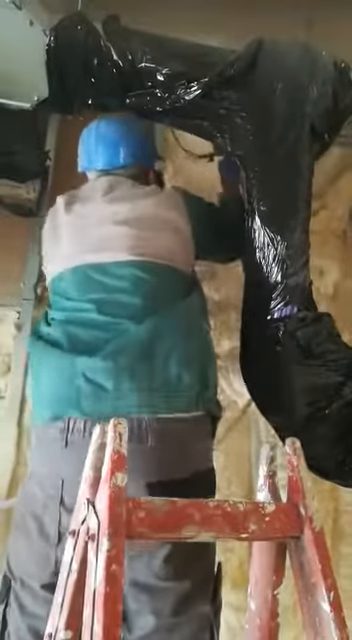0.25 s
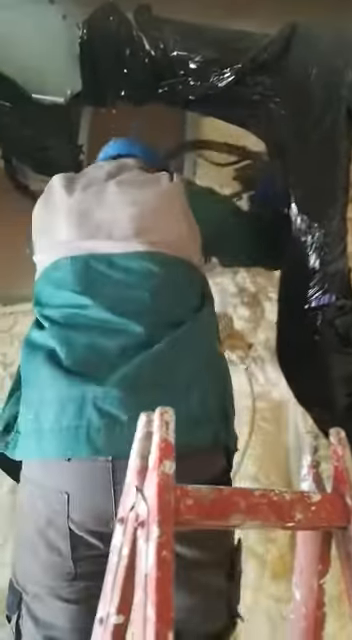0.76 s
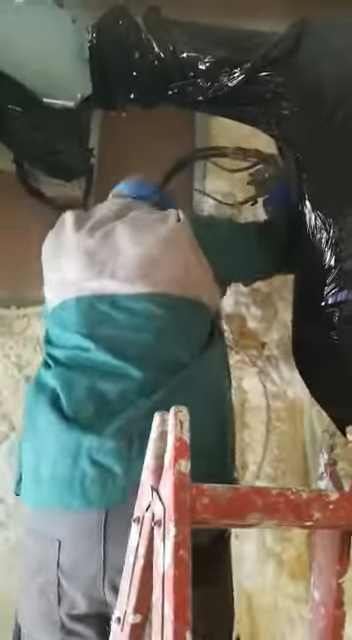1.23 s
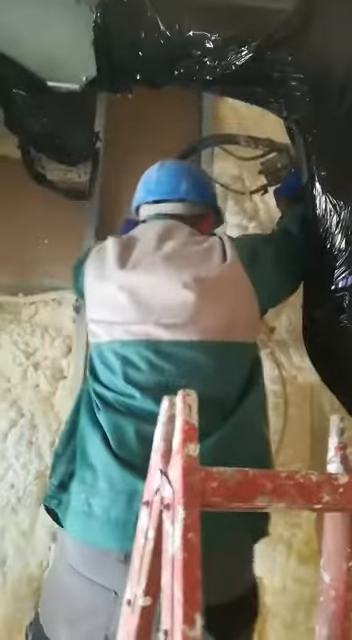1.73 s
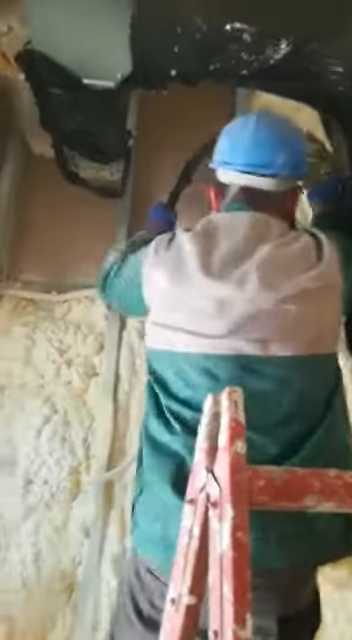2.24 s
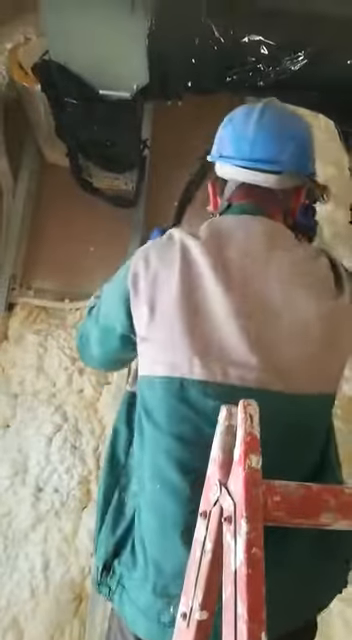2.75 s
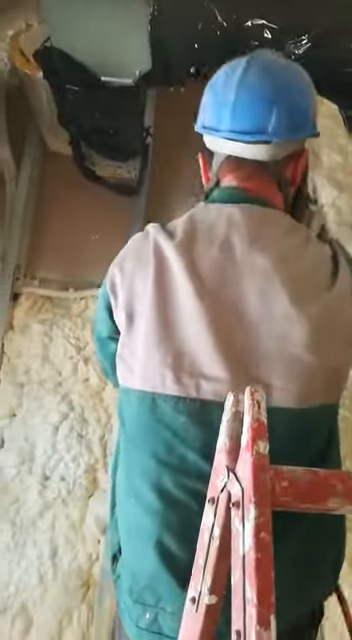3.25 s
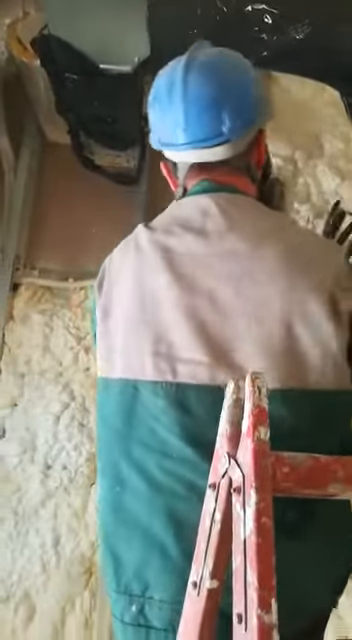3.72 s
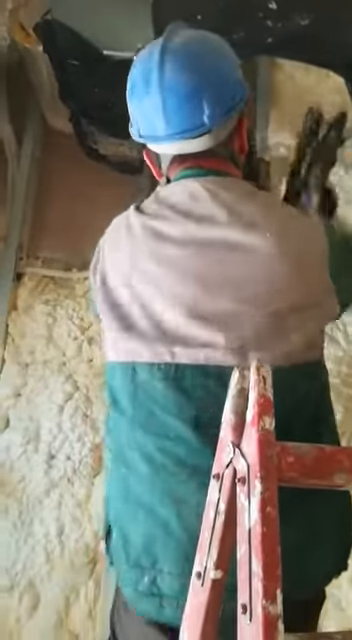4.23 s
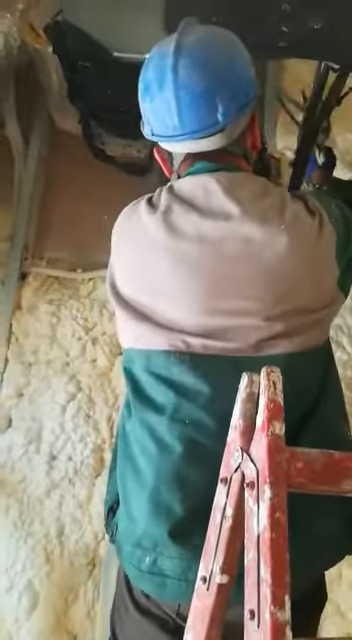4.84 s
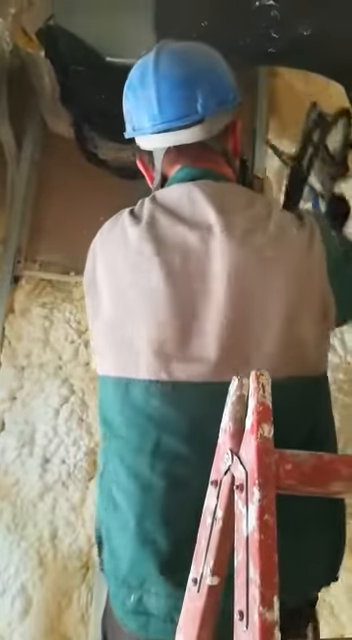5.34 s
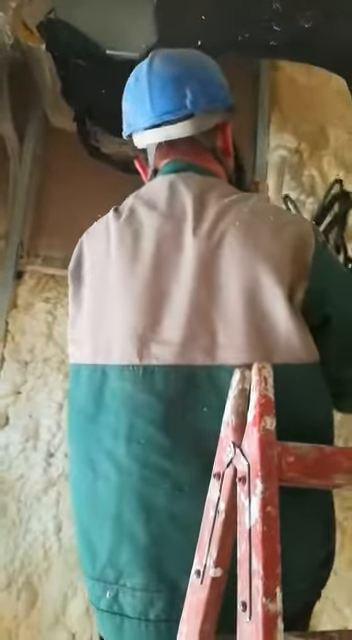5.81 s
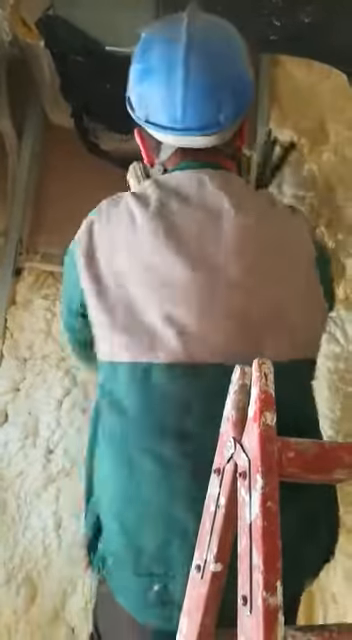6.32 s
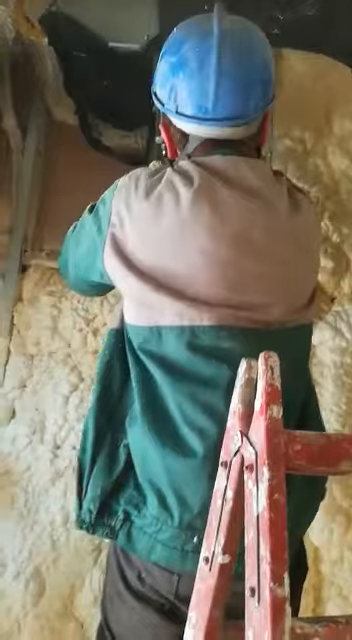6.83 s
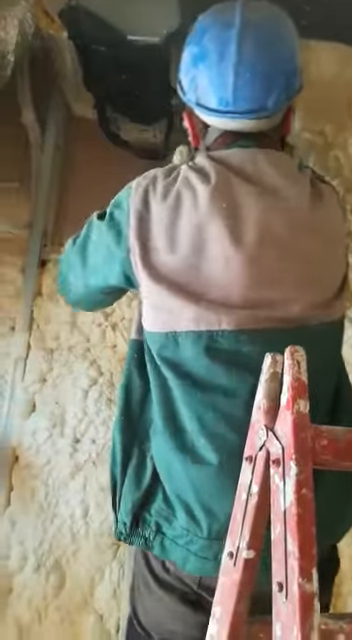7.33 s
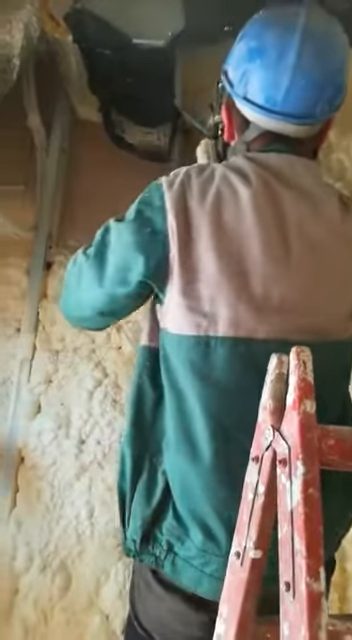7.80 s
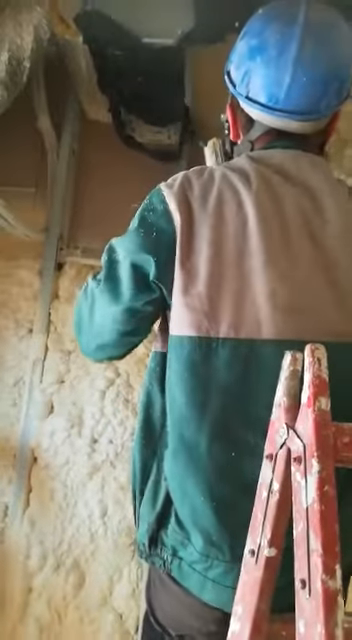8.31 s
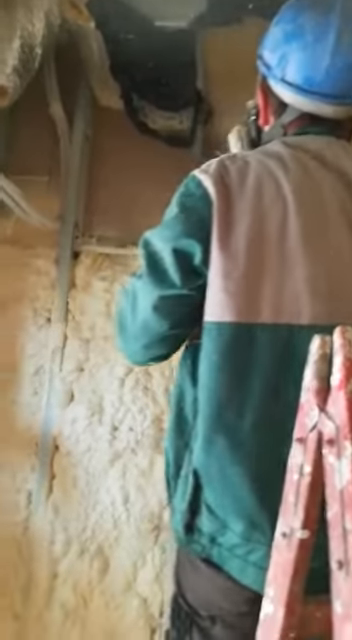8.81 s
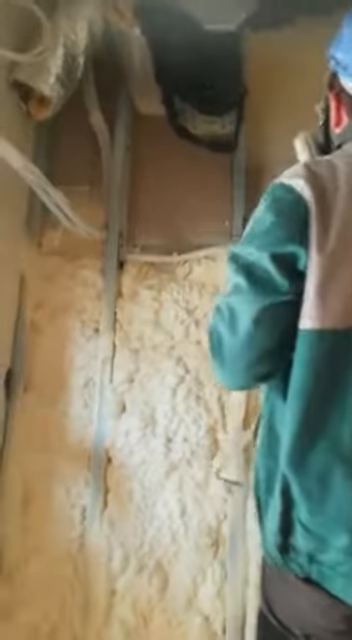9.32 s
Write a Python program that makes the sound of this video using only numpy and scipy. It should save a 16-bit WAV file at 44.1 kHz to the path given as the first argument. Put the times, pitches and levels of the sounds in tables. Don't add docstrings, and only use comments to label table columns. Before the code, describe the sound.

In a small foam-lined room on a building site, a spray gun bleeds air in a constant bright hiss. Early on there are scrapes, brief foam squeaks and scattered boot and hose knocks. Halfway through, trigger pulls make the hiss surge in uneven bursts, then a pull is held to the end. A pump rumbles faintly far away. Handheld stereo microphone nearby, duller in treble on the left.

```python
import sys
import numpy as np
from scipy import signal
from scipy.fft import rfft, irfft, next_fast_len
from scipy.io import wavfile

SR = 44100
rng = np.random.default_rng(int(sys.argv[2]) if len(sys.argv) > 2 else 0)


def file_out(sig):
    cols = np.atleast_2d(sig).T
    lim = np.clip(cols, -1, 1)
    pcm = np.round(lim * 32767).astype(np.int16)
    wavfile.write(sys.argv[1], SR, pcm)


def boost(x):
    u = np.asarray(x, float) / 20
    return 10 ** u


N = 421596
SECONDS = np.arange(N) / SR
SIZE = next_fast_len(N + SR // 2)
HZ = np.maximum(np.arange(SIZE // 2 + 1) * SR / SIZE, 1)

# time in seconds, share from 0 to 1.
SWING = [
    (0, 0),
    (6.1, 0),
    (6.25, 1),
    (6.85, 1),
    (7.1, 0),
    (9.56, 0),
]


def rms_one(x):
    return x / np.sqrt(np.mean(x ** 2) + 1e-20)


def in_time(rows):
    s, *columns = np.transpose(rows)
    return [np.interp(SECONDS, s, column) for column in columns]


def at_hz(points):
    hz, value = np.transpose(points)
    return np.interp(np.log(HZ), np.log(hz), value)


def drift(rate):
    r = np.exp(-80 * np.pi * rate / SR)
    slow = signal.lfilter([1], [1, -2 * r, r * r], rng.standard_normal(N // 40 + 2002))
    slow = rms_one(slow[2000:])
    return np.interp(np.arange(N) / 40, np.arange(len(slow)), slow)


def coloured(x, gain):
    return irfft(rfft(x, SIZE) * gain, SIZE)[..., :N]


def noise(colour):
    return rms_one(coloured(rng.standard_normal((2, N)), boost(at_hz(colour))))


def resonance(x, hz, width_hz):
    r = np.exp(-np.pi * width_hz / SR)
    poles = [1, -2 * r * np.cos(2 * np.pi * hz / SR), r * r]
    return signal.lfilter(np.array([1, 0, -1]) * (1 - r * r) / 2, poles, x)


def sharp_band(x, hz, width_hz):
    return rms_one(resonance(resonance(x, hz, width_hz), hz, width_hz))


def wavering_modes(x, modes, waver_db, rate):
    return rms_one(sum(boost(db + waver_db * drift(rate)) * sharp_band(x, hz, width_hz)
                       for hz, width_hz, db in modes))


def stroke(start, length, rise_s, fade_db_per_s):
    t = SECONDS - start
    return np.clip(t / rise_s, 0, 1) ** 2 * boost(-fade_db_per_s * np.clip(t - length, 0, 1))


def draught():
    # time of the peak in seconds, peak level in dB.
    puffs = [(0.0, -32), (.17, -53), (.37, -50), (.53, -45.5), (.74, -50), (.98, -42), (1.33, -54),
             (2.05, -52), (2.21, -52), (4.37, -59), (4.79, -47), (5.0, -56), (5.78, -68), (6.23, -56),
             (6.65, -51), (6.89, -47), (7.85, -62), (8.23, -48), (9.51, -51)]
    rise_s, fade_db_per_s, calm_db = 0.042, 64, -66
    gusts = boost(calm_db)
    for s, peak_db in puffs:
        gusts = gusts + boost(peak_db) * stroke(s - rise_s, rise_s, rise_s, fade_db_per_s)
    return gusts * noise([(8, -6), (16, 0), (26, -3), (40, -13), (50, -23), (90, -30), (200, -48)])


def rumble():
    # frequency in Hz, level in dB per Hz.
    pump_colour = [(40, -27), (65, -2), (85, -21), (110, 3), (150, -4), (230, -3.5), (300, -7.5),
                   (420, -15), (600, -19), (900, -14), (1400, -23.5)]
    # time in seconds, level in dB.
    pump_level = [(0.0, -46.5), (0.12, -59.5), (2.8, -60), (3.6, -58), (4.2, -60), (6.0, -56.5), (8.0, -63),
                  (9.56, -65)]
    # frequency in Hz, width in Hz, level in dB.
    room_modes = [(69.4, 12, -70), (105.8, 10.6, -62), (177.2, 14.6, -61.5), (473, 36, -76.5)]
    modes = wavering_modes(rng.standard_normal((2, N)), room_modes, waver_db=1.5, rate=4)
    lumpy_db = in_time(pump_level)[0] + 1.6 * drift(2)
    steady = noise(pump_colour) * boost(2.5 + 1.8 * drift(26))
    return boost(lumpy_db) * (steady + boost(-2.5) * modes)


def knocks():
    # start in seconds, peak in dB, body pitch in Hz, time to fade by 60 dB in seconds, crack in dB.
    hits = [(1.621, -48, 223, 0.12, -8), (2.31, -43, 234, 0.11, -5), (2.366, -44, 150, 0.11, -12),
            (2.523, -39, 796, 0.22, 5.5), (2.757, -38.5, 250, 0.06, -12), (2.927, -48, 225, 0.12, -5),
            (3.086, -58, 199, 0.1, -8), (3.272, -45, 400, 0.14, -13), (3.616, -29.5, 320, 0.11, -9),
            (3.638, -29.5, 226, 0.18, -22), (4.342, -45, 248, 0.14, -8), (6.284, -46, 248, 0.12, -9)]
    out, t = np.zeros((2, N)), np.arange(SR // 3) / SR
    for s, peak_db, hz, fade_s, crack_db in hits:
        puff = rng.standard_normal((2, len(t))) * np.minimum(t / 0.002, 1)
        body = rms_one(resonance(puff, hz, 0.37 * hz)) * boost(-60 * t / max(fade_s, .02))
        crack = rms_one(resonance(puff, 1500, 3000)) * boost(crack_db - 60 * t / .12)
        at = round(s * SR)
        out[:, at:at + len(t)] += boost(peak_db - 5.0) * (body + crack)
    return out


def squeaks(wobble=.007):
    # start in seconds, length in seconds, first pitch in Hz, level in dB.
    rubs = [
        (.635, .045, 635, -44),
        (.835, .12, 600, -41.5),
        (1.987, .045, 660, -44),
    ]
    # multiple of the pitch, level in dB.
    orders = [(1, -7), (1.5, -15), (1.7, -11), (2, -12), (3, -24), (4, -26)]
    top_hz, climb_s, sag_db_per_s = 685, .035, 70
    out = 0
    for s, length, first_hz, level_db in rubs:
        t = np.clip(SECONDS - s, 0, 1)
        hz = top_hz - (top_hz - first_hz) * np.exp(-(t / climb_s) ** 2)
        phase = 2 * np.pi * np.cumsum(hz * (1 + wobble * drift(60))) / SR
        lines = sum(boost(db + 3.0 * drift(30)) * np.sin(k * phase) for k, db in orders)
        loudness = boost(level_db - sag_db_per_s * t) * stroke(s, length, 0.0075, 460)
        out = out + np.sqrt(2) * lines * loudness
    return out


def strokes():
    # start in seconds, length in seconds, then studs, hollow wall and sheeting, each in dB.
    rubs = [(0.406, 0.067, -50.5, -57, -50), (0.507, 0.095, -47.5, -61, -47), (.62, .05, -45, -67, -51),
            (0.789, .17, -46, -63, -47), (1.984, 0.098, -51.5, -82, -57), (3.266, .05, -51, -47, -64),
            (3.327, .25, -47.5, -56, -54), (3.61, 0.025, -48, -45, -59), (3.696, .2, -58, -61, -78),
            (4.34, .17, -54, -61.5, -62), (4.505, 0.69, -49, -56, -46.5), (5.309, 0.24, -51.5, -57, -46),
            (5.615, 0.44, -44, -49, -50), (5.795, 0.05, -45, -45, -75), (5.96, 0.059, -43, -52, -75),
            (6.265, .05, -51, -54.5, -75), (6.34, 0.22, -59, -67, -79), (8.2, 0.25, -65, -61, -75),
            (8.72, 0.16, -55, -69, -52), (8.858, 0.2, -49, -67, -48), (9.19, 0.22, -61, -63, -75)]
    rise_s, fade_db_per_s, uneven_db = 0.011, 226, -1
    shapes = np.array([stroke(s, length, rise_s, fade_db_per_s) for s, length, *_ in rubs])
    power = boost(np.array(rubs)[:, 2:].T) ** 2 @ shapes ** 2
    return np.sqrt(power) * boost(uneven_db * drift(3))


def scrapes(grain_per_s=2500, spread_db=3):
    # frequency in Hz, level in dB per Hz.
    stud_colour = [(380, -44), (520, -6), (650, 5.5), (1000, 6), (1400, -2), (2000, -2.5), (3000, -9.5)]
    sheet_colour = [(900, -34), (1400, -5), (2000, -4), (3000, -3.5), (4500, -13), (7000, -16)]
    # frequency in Hz, width in Hz, level in dB.
    stud_modes = [(600, 110, 1), (798, 92, 11.5), (1045, 79, 3.5), (1462, 28, 8.5)]
    sheet_modes = [(1737, 100, 1), (2100, 120, -4), (2290, 71, 12), (3140, 44, -6), (3340, 310, 6)]
    wall_modes = [(249, 92, 6.5), (320, 67, 3.5), (400, 35, -1.5), (463, 36, 0.5)]
    happens = rng.random((2, N)) < grain_per_s / SR
    strength = boost(spread_db * rng.exponential(1, (2, N)))
    slips = happens * strength * rng.choice([-1, 1], (2, N))
    rasp = rms_one(coloured(slips, boost(at_hz(stud_colour))))
    studs = rasp * boost(-1.5) + wavering_modes(slips, stud_modes, waver_db=3.5, rate=2.2) * boost(-10.5)
    rustle = rms_one(coloured(slips, boost(at_hz(sheet_colour))))
    sheet = rustle * boost(-1.5) + wavering_modes(slips, sheet_modes, waver_db=3.0, rate=7.2) * boost(-9.0)
    boom = wavering_modes(slips, wall_modes, waver_db=1.5, rate=5)
    stud_gain, boom_gain, sheet_gain = strokes()
    return studs * stud_gain + boom * boom_gain + sheet * sheet_gain


def flow():
    # time in seconds, hiss in dB, fullness in dB
    steady_air = [(0.0, -28, -5), (0.66, -28, -2), (1.1, -30.5, 0), (2.0, -28, -2.5), (2.42, -28.5, -3.5),
                  (2.86, -27.5, -4), (3.52, -30.5, -1), (4.2, -29.5, -2), (4.48, -26.5, -0.5),
                  (5.33, -29.5, 0), (5.92, -29.5, 3.5), (6.03, -27.5, 4), (6.2, -25, -2),
                  (6.72, -28.5, 0.5), (7.0, -30.5, 1), (7.85, -29.5, 0.5), (8.35, -32, 1.5),
                  (9.56, -32.5, 4)]
    # open and shut in seconds, lift in dB, surge in dB, added fullness in dB.
    pulls = [
        (4.514, 5.183, 6, 1.5, 2),
        (5.2, 5.3, 3.5, 1.5, -1.5),
        (5.329, 5.549, 10, -2, 2),
        (5.607, 6.047, 4, 7.5, 1.5),
        (6.082, 6.122, 2.5, 0.7, -3.5),
        (6.262, 6.552, 5, -2, -1.5),
        (6.462, 6.55, 3.5, -2, -1),
        (6.615, 9.6, 7.5, -0.5, -0.43),
    ]
    open_s, shut_s, surge_s = 0.013, 0.042, 0.21
    top_db, full_db = in_time(steady_air)
    for start, stop, lift_db, surge_db, fill_db in pulls:
        opening = np.clip((SECONDS - start) / open_s, 0, 1)
        opened = opening * np.clip(1 - (SECONDS - stop) / shut_s, 0, 1)
        surge = surge_db * np.exp(-np.maximum(SECONDS - start, 0) / surge_s)
        top_db = top_db + opened * (lift_db + surge)
        full_db = full_db + opened * fill_db
    return top_db, full_db


def whistles():
    # middle in seconds, length in seconds, pitch in Hz, width in Hz, level in dB against the top hiss.
    tones = [(.3, 0.5, 9530, 800, -15), (1.4, .4, 9000, 300, -21), (2.05, .14, 14800, 1100, -6),
             (2.15, 0.083, 9700, 500, -16), (2.9, 0.18, 13400, 600, -17), (6.3, .1, 11600, 1000, -16),
             (6.45, .06, 13300, 600, -18), (7.3, .15, 10640, 400, -16)]
    air = rng.standard_normal((2, N))
    return sum(boost(db) * np.exp(-.5 * ((SECONDS - s) / length) ** 2) * sharp_band(air, hz, width_hz)
               for s, length, hz, width_hz, db in tones)


def near_wall(x):
    echo_s, sway_s, echo_db = .0016, .00012, -14
    n, swing = np.arange(N), in_time(SWING)[0]
    out = []
    for side in x:
        delay_s = echo_s + sway_s * (drift(.8) + 2.5 * swing * drift(3))
        echo = np.interp(n - SR * delay_s, n, side)
        out.append(side + boost(echo_db + 7 * swing) * echo)
    return np.array(out)


def jet(flutter_db=0.12, patchy_db=0.47):
    # frequency in Hz, level in dB per Hz.
    hiss_colour = [(250, -26.5), (400, -24), (600, -27.5), (1050, -18), (1500, -18.5), (2200, -19),
                   (3000, -11.5), (4000, -7.5), (6000, -7), (8000, -4.5), (11000, -1), (13000, 1.5),
                   (14800, 6), (15700, 2)]
    pivots_hz = [1990, 4040, 13400]
    roar_per_fullness, swing_thins_db = 1.26, -2
    swing_flutters_db = .6
    top_db, full_db = flow()
    swing = in_time(SWING)[0]
    roar_db = roar_per_fullness * full_db + swing_thins_db * swing
    tilt = np.array([roar_db, full_db, np.zeros(N)])
    spectrum = rfft(noise(hiss_colour), SIZE)
    centres = np.log(np.geomspace(500, 15500, num=18))
    together = flutter_db * (drift(14) + 0.27 * drift(33))
    patches_db = patchy_db + swing_flutters_db * swing
    out = 0
    for k, centre in enumerate(centres):
        share = np.interp(np.log(HZ), centres, np.arange(len(centres)) == k)
        band = irfft(spectrum * share, SIZE)[:, :N]
        blend = [np.interp(centre, np.log(pivots_hz), row) for row in np.eye(3)]
        out = out + band * boost(blend @ tilt + patches_db * drift(11.5))
    return (near_wall(out) + whistles()) * boost(top_db + together + 2.0)


def room(x):
    t = np.arange(SR // 3) / SR
    tail = rng.standard_normal((2, len(t))) * boost(-60 * t / .2) * (t > .003)
    tail = tail / np.sqrt(np.sum(tail ** 2, axis=1, keepdims=True))
    return .8 * x + .6 * coloured(x, rfft(tail, SIZE))


def ports(field):
    # frequency in Hz, left-right likeness from 0 to 1, left's lead in radians.
    likeness = [(60, .995, 0), (150, .97, 0), (300, .72, .1), (600, .45, 2.0), (800, .4, 1.5),
                (1000, .35, .2), (1500, .35, 1.4), (1950, .45, 3), (2300, .55, 3.1), (2800, .4, 3.3),
                (3500, .2, 6.1), (4300, .05, 6.5)]
    # frequency in Hz, share from 0 to 1.
    direct = [(4500, 0.066), (6500, 0.43), (8800, .33), (11000, .15), (16000, .12)]
    # frequency in Hz, left against right in dB.
    left_port = [(200, 1.5), (400, -0.5), (700, 6), (1200, -2), (2400, 1.9), (4400, 0), (6000, -2.5),
                 (7200, -10), (8200, -14.5), (9800, -39), (12500, -22.5), (15500, -19)]
    left_lag_s = 0.000514
    a, b = rfft(field, SIZE)
    hz, share, lead = np.transpose(likeness)
    diffuse = at_hz(np.c_[hz, share]) * np.exp(1j * at_hz(np.c_[hz, lead]))
    straight = np.clip(at_hz(direct), 0, .7) * np.exp(-2j * np.pi * HZ * left_lag_s)
    alike = diffuse + straight
    left_gain = boost(at_hz(left_port))
    left = left_gain * (alike * a + np.sqrt(np.clip(1 - abs(alike) ** 2, 0, 1)) * b)
    centre = np.sqrt(1 + left_gain ** 2 + 2 * left_gain * alike.real) / 2
    return irfft(np.array([left, a]) / centre, SIZE)[:, :N]


def scene():
    return ports(draught() + rumble() + knocks() + room(squeaks()) + scrapes() + jet())


def band_limit(x):
    return signal.sosfilt(signal.butter(12, 15900, fs=SR, output="sos"), x)


def record(dry):
    top_cut = signal.ellip(14, .3, 60, 15760, fs=SR, output="sos")
    return band_limit(signal.sosfilt(top_cut, dry))


dry = scene()
out = record(dry)
file_out(out)
```